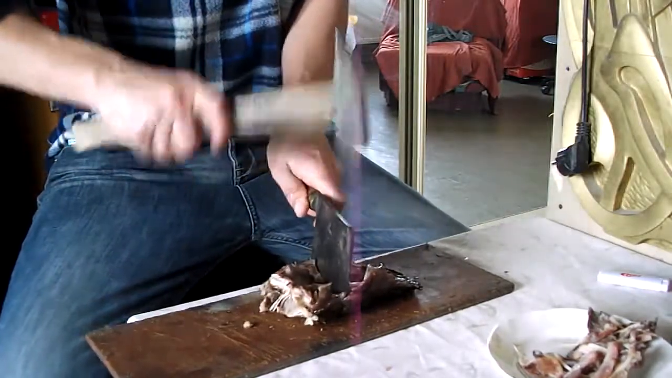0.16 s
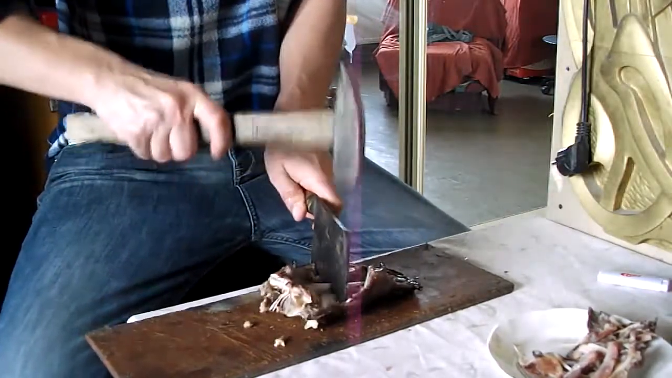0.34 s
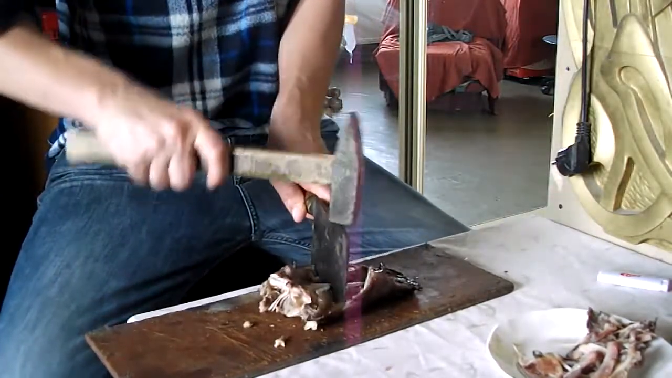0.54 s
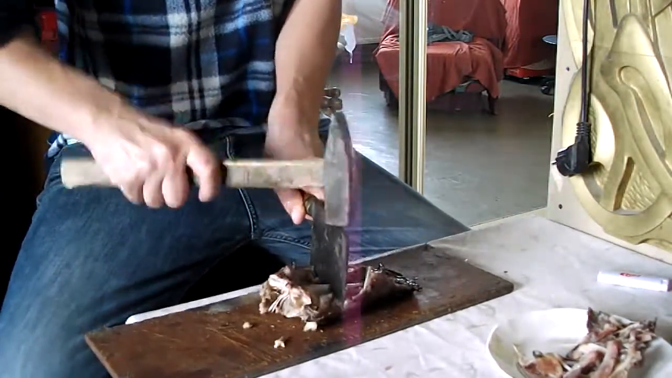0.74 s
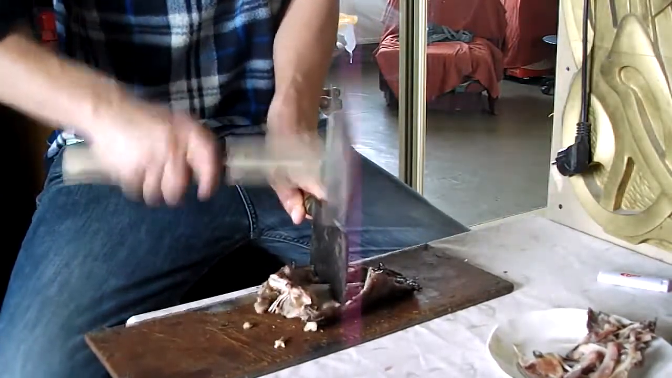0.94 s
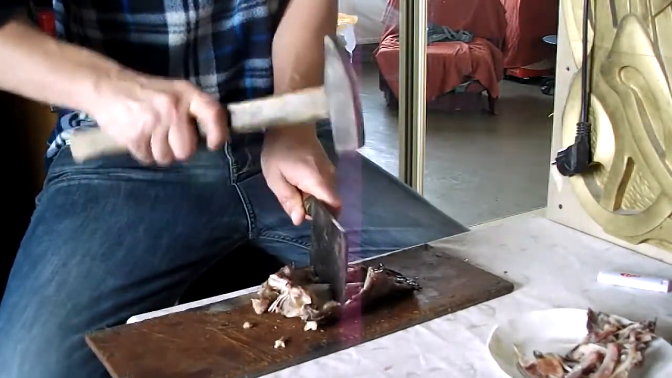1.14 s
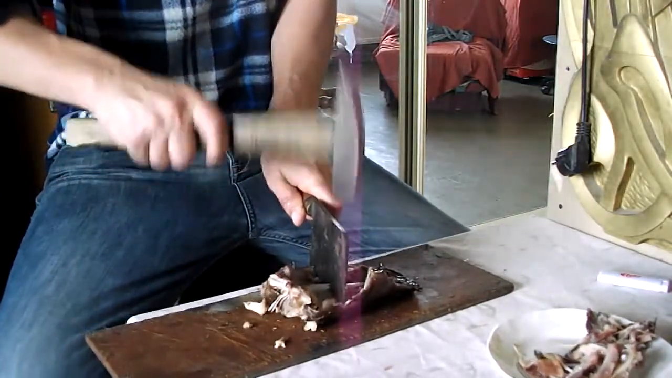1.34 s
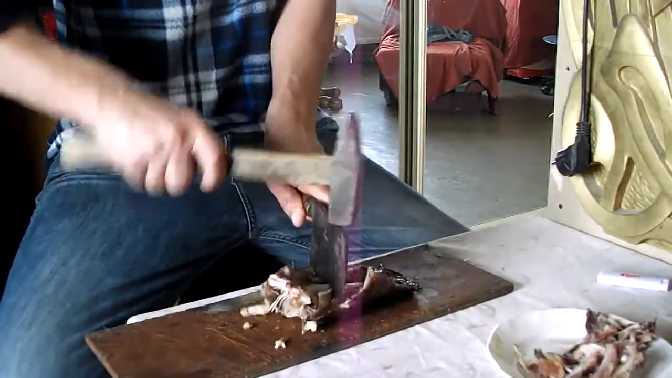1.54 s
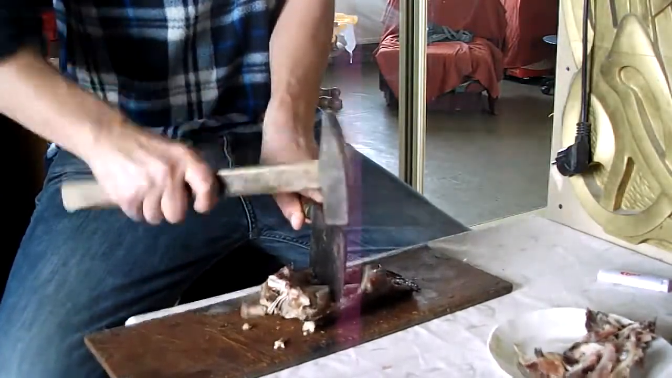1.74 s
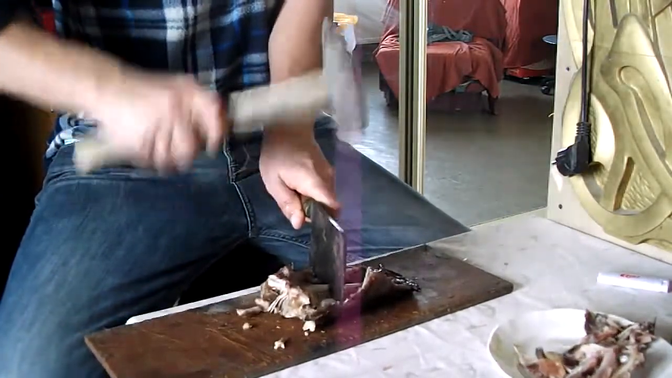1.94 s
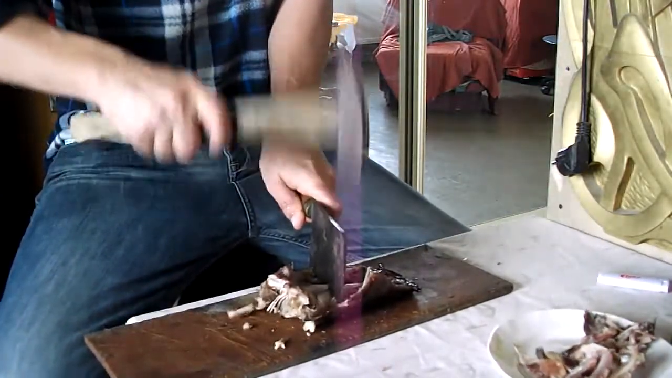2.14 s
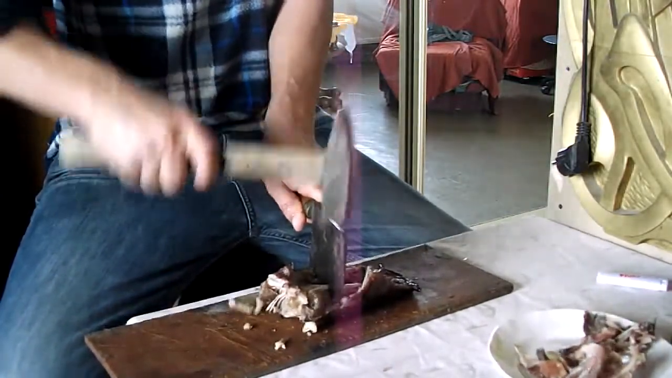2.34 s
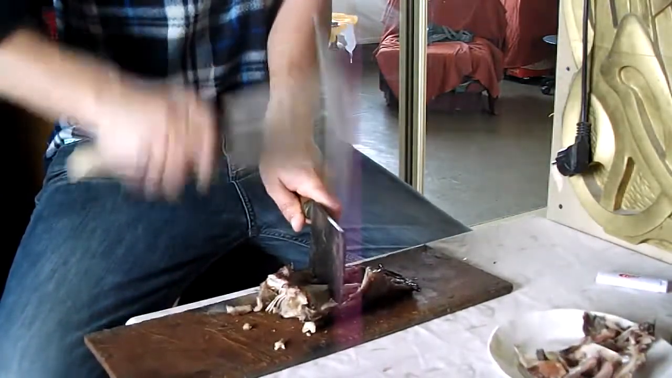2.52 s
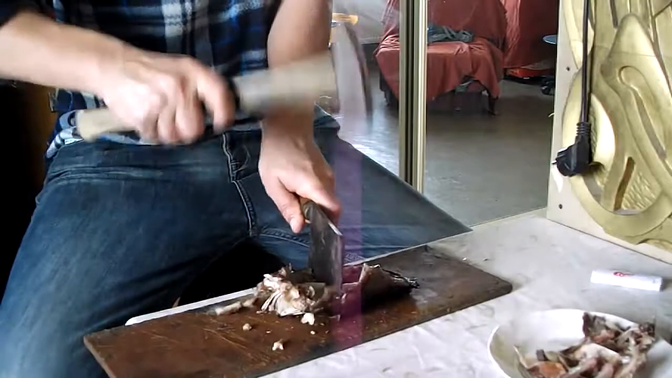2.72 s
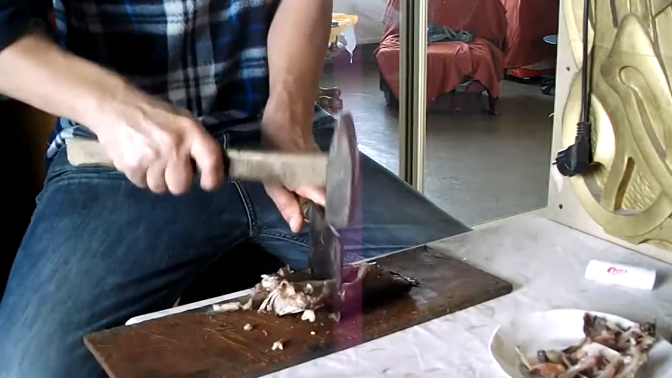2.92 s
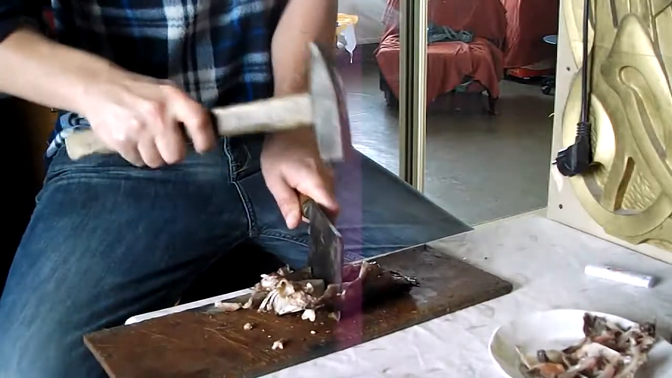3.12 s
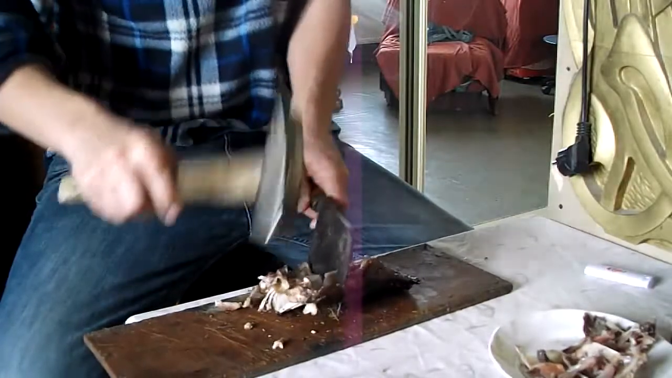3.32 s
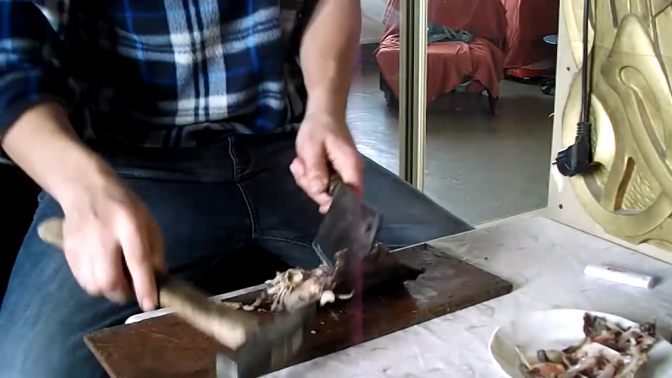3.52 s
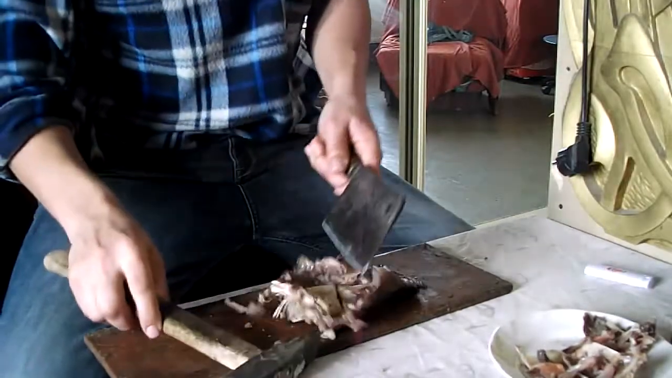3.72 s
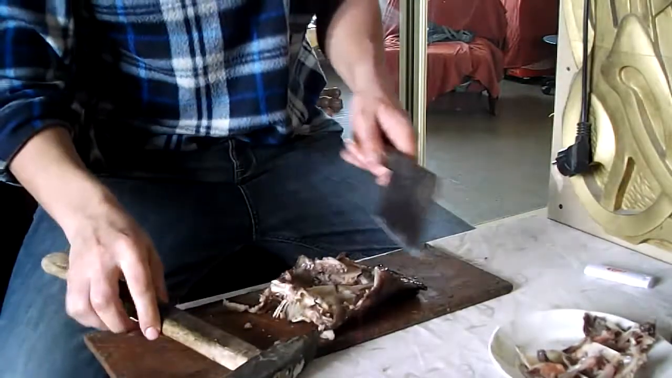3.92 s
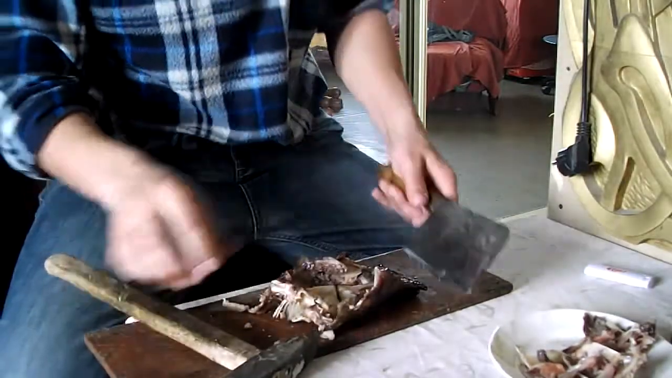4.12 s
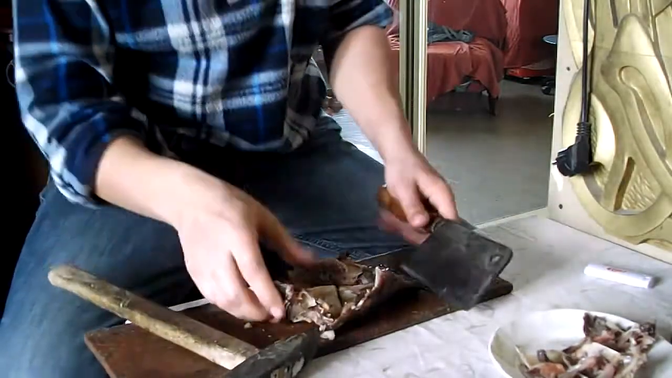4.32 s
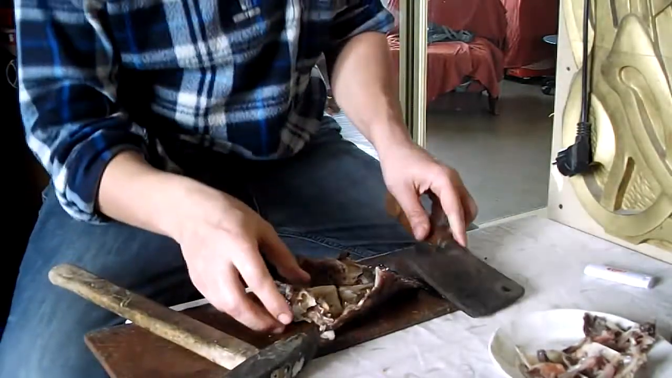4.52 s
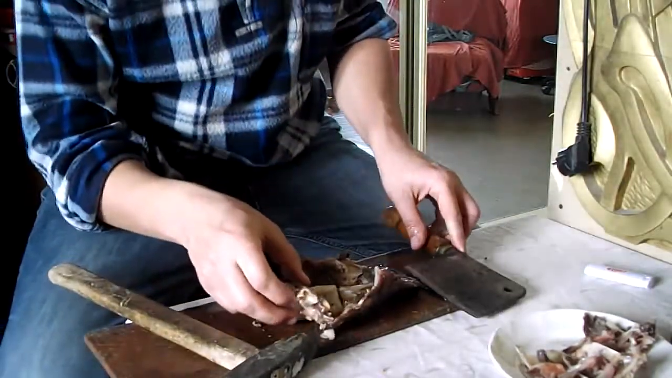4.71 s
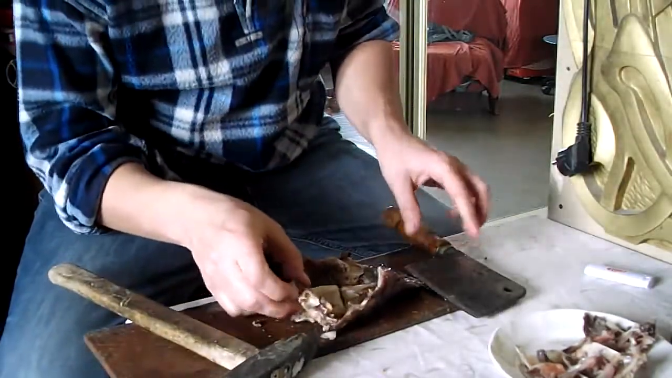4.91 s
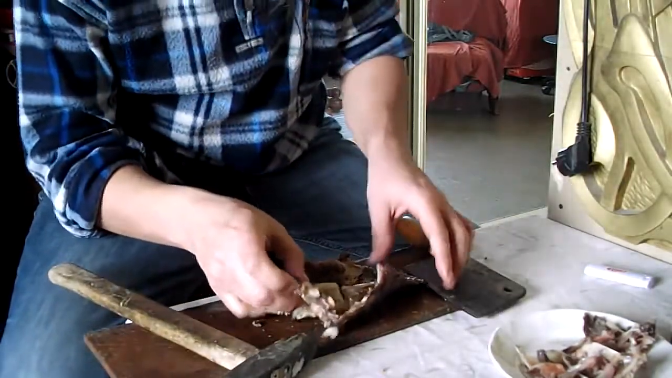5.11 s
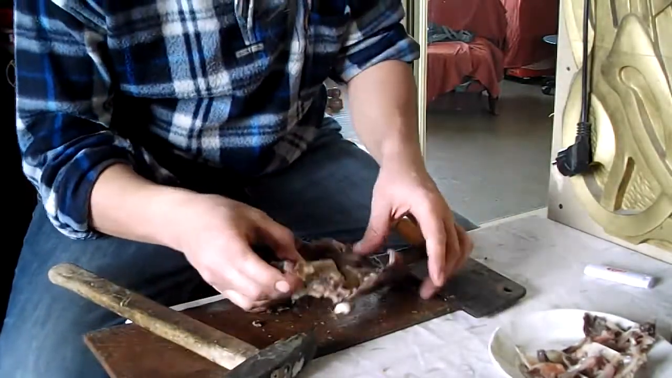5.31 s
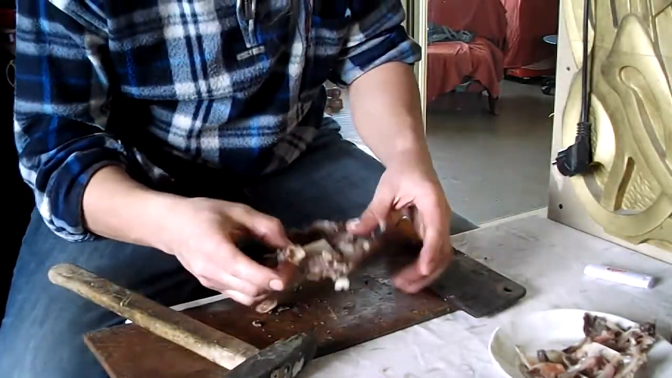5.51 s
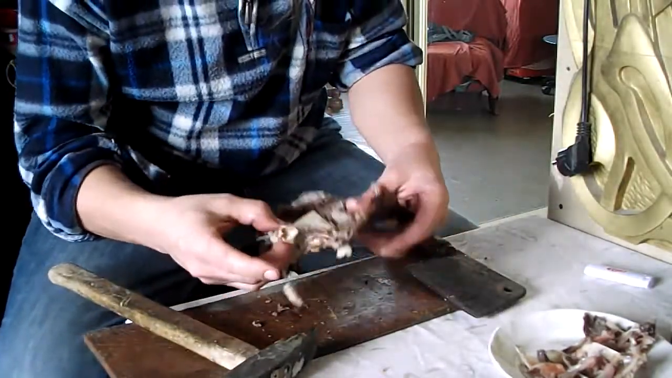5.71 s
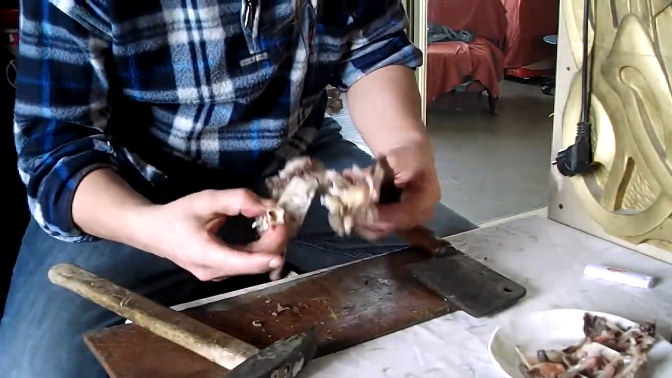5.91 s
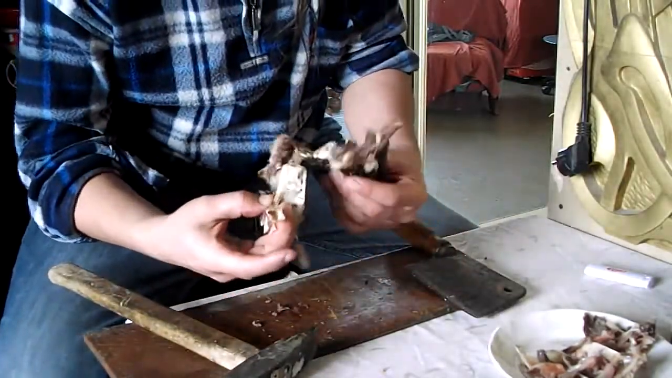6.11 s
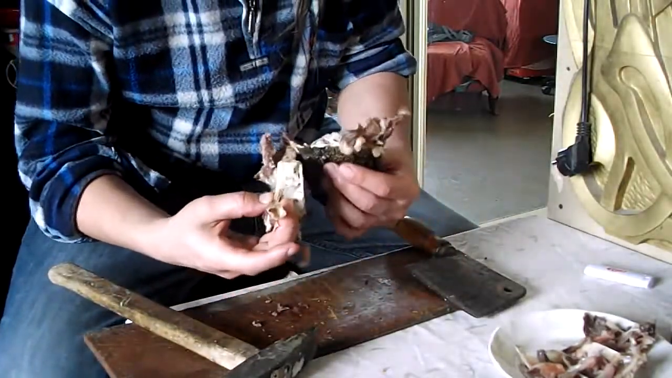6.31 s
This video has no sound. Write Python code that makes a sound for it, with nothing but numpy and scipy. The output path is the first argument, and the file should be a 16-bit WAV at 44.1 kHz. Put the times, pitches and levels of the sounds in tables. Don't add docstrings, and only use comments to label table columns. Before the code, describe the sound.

Rapid, regular hammer blows on a cleaver, bright and clipped at a nearby camera microphone, with brief hard-room reflections. The background hiss ducks after the blows and swells back once they stop. Next come a gritty blade drag, light clicks, a dull wooden touch and a sharp steel clank on the board, then sparse dry bone cracks and a short stick-slip creak over soft rumble and thin electronic whine.

```python
import sys
import numpy as np
from scipy import signal
from scipy.fft import rfft, irfft, next_fast_len
from scipy.io import wavfile
from scipy.ndimage import uniform_filter1d, map_coordinates

SR = 44100
rng = np.random.default_rng(int(sys.argv[2]) if len(sys.argv) > 2 else 0)


def transcribe(signal):
    frames = np.atleast_2d(signal).T
    limited = np.clip(frames, -1, 1)
    pcm = np.round(limited * 32767).astype(np.int16)
    wavfile.write(sys.argv[1], SR, pcm)


def to_linear_factor(level_db):
    exponent = np.asarray(level_db, float) / 20
    return 10 ** exponent


N = 284483

# t/s, clank level/dB, then relative to it table boom/dB, steel edge/dB, shove/dB
BLOW_EVENTS = [(0.171, -4, -29.5, -6, -25), (0.4193, -2, -23, -13, -16), (0.6707, -2, -17.5, -10.5, -8),
               (0.9109, -4.5, -16.5, -17, -10), (1.1658, -3.5, -15.5, -14, -31.5),
               (1.4203, -6, -18, -16, -24), (1.6807, -3, -19.5, -13, -27), (1.9558, -4, -18.5, -17, -14.5),
               (2.227, -4, -20, -20, -8), (2.503, -3.5, -25, -17, -11), (2.7769, 0.5, -22.5, -31, 3)]
EARLIER_BLOW = (-.09, -7, -24, -6, -30)
ALL_BLOWS = [EARLIER_BLOW, *BLOW_EVENTS]
# t/s, clank level/dB, then relative to it blade flex/dB, table boom/dB, board knock/dB
LAID_TOOLS = [
    (3.5701, -27, -7.5, 2.5, -15),
    (3.5948, -21, -10, -28, -18),
    (4.1924, -33, 4, 7, 8),
    (4.468, -2, -3, -16.5, -11),
    (4.644, -41, -12, 5, 3.5),
]


def unit(x):
    return x / np.sqrt(np.mean(x ** 2) + 1e-20)


def along(points, hz):
    f, v = np.transpose(points)
    return np.interp(np.log(hz + 1), np.log(f + 1), v)


def curve(rows):
    return np.interp(np.arange(N) / SR, *np.transpose(rows))


def wobble(rate):
    knots = rng.standard_normal(int(N * rate / SR) + 4)
    return map_coordinates(knots, [np.arange(N) * rate / SR])


def filtered(x, response):
    m = next_fast_len(len(x) + SR // 5)
    return irfft(rfft(x, m) * response(np.fft.rfftfreq(m, 1 / SR)), m)[:len(x)]


def noise(spectrum):
    return filtered(rng.standard_normal(N), lambda hz: to_linear_factor(along(spectrum, hz)))


def body(x, peaks, scatter_db):
    gains = to_linear_factor(scatter_db * rng.standard_normal(len(peaks)))
    y = 0
    for k, (centre, width, db) in enumerate(peaks):
        def mode(f):
            return gains[k] * to_linear_factor(db) * 1j * f * width / (centre ** 2 - f ** 2 + 1j * f * width)
        y = y + filtered(x[k % len(x)], mode)
    return y / np.abs(y).max()


def add(track, s, x):
    i = round(s * SR)
    part = x[max(-i, 0):N - i]
    track[max(i, 0):][:len(part)] += part


def since(times):
    age = np.arange(N) / SR - np.array(times)[:, None]
    return np.where(age < 0, np.inf, age)


def since_blow():
    return since([row[0] for row in ALL_BLOWS]).min(axis=0)


def gain_db():
    duck_db, recover_db_per_s, loud_db = 14, 49.5, -11
    loud = [s for s, db, *_ in [*ALL_BLOWS, *LAID_TOOLS] if db > loud_db]
    depth = [duck_db + 11]
    for gap in np.diff(loud):
        depth.append(duck_db + max(depth[-1] - recover_db_per_s * gap, 0))
    reduction = np.array(depth)[:, None] - recover_db_per_s * since(loud)
    return -np.maximum(reduction.max(axis=0), 0)


def hiss():
    # f/Hz, level/dB per Hz
    hiss_density = [(120, -30.5), (200, -5), (450, -12.5), (900, -16.5), (1500, -22), (3000, -18.5),
                    (5000, -19.5), (6800, -25), (8000, -19), (8900, -12.5), (9800, -23), (11300, -23.5),
                    (12500, -28), (15800, -40)]
    return to_linear_factor(gain_db() - 52.5 + 0.28 * wobble(10)) * unit(noise(hiss_density))


def whine():
    # f/Hz, rms level/dB
    whine_tones = [(10551, -72.5), (10632, -87.5), (10713, -61.5), (10794, -70.5), (10880, -69.5),
                   (10960, -78), (11364, -70.5)]
    t = np.arange(N) / SR
    tones = sum(to_linear_factor(db) * np.sin(2 * np.pi * (hz * t + rng.random())) for hz, db in whine_tones)
    return np.sqrt(2) * to_linear_factor(gain_db()) * tones


def shake():
    # t/s, rumble level/dB
    hand_leans = [
        (3.66, -41.5),
        (3.95, -48),
        (4.37, -48),
        (4.99, -55),
        (5.229, -45),
        (5.459, -54.5),
    ]
    half_width_s, t60 = 0.094, 1.6
    t = np.arange(N) / SR
    blows = to_linear_factor(-46.5 - 60 * since_blow() / t60)
    leans = sum(to_linear_factor(db) * np.exp(-((t - s) / half_width_s) ** 2) for s, db in hand_leans)
    return blows + leans + to_linear_factor(-55.5 + gain_db())


def rumble():
    # f/Hz, level/dB per Hz
    rumble_density = [(25, -12.5), (45, -2), (65, -4.5), (120, -7), (250, -19), (500, -30.5), (1000, -48.5),
                      (2000, -100)]
    lumps = to_linear_factor(1.3 * wobble(3) + 1.6 * wobble(37))
    return shake() * unit(lumps * noise(rumble_density))


def sway():
    # f/Hz, level/dB per Hz
    rock_density = [(8, -9.5), (18, 1), (28, -3.5), (45, -16.5), (70, -33), (120, -74)]
    u = np.minimum(since_blow() / 0.17, 20)
    swing = to_linear_factor(-40.5) * u ** 2 * np.exp(1 - u ** 2)
    still = to_linear_factor(-49 + gain_db() + 3 * wobble(7.3))
    return (swing + still) * unit(noise(rock_density))


def hum():
    # f/Hz, rms level/dB, on t/s, off t/s
    hum_tone = (901.5, -72, 3.15, 4.05)
    hz, db, on, off = hum_tone
    level = to_linear_factor(curve([(on - .1, -110), (on, db), (off, db), (off + 0.12, -110)]))
    return np.sqrt(2) * level * np.sin(2 * np.pi * hz * np.arange(N) / SR)


def kitchen(x, blur_hz):
    # f/Hz, t60/s
    kitchen_t60 = [(100, 0.22), (400, 0.24), (1200, 0.25), (3000, 0.32), (6000, 0.31), (7500, 0.28),
                   (11300, 0.31), (12000, 0.043)]
    hz, t, z = signal.stft(rng.standard_normal(len(x)), SR, nperseg=256)
    t60 = along(kitchen_t60, hz)[:, None]
    slow_tail = to_linear_factor(-19 - 60 * t / (2.64 * t60))
    decay = to_linear_factor(-60 * t / t60) + slow_tail
    tail = signal.istft(z * decay, SR, nperseg=256)[1]
    tail = tail / np.linalg.norm(tail)
    tail = np.pad(tail, (round(.004 * SR), 0))[:len(x)]
    bins = max(round(blur_hz * len(x) / SR), 1)
    power = uniform_filter1d(np.abs(rfft(x)) ** 2, bins)
    spectrum = np.sqrt(np.abs(power))
    return filtered(tail, lambda f: np.interp(f, np.fft.rfftfreq(len(x), 1 / SR), spectrum))


def creak():
    # start t/s, end t/s, slip rate f/Hz, first slip level/dB
    joint_twist = (6.212, 6.4, 96, -38.5)
    # f/Hz, width/Hz, level/dB
    joint_modes = [(1200, 90, 0), (2700, 300, -22)]
    on, off, rate, db = joint_twist
    draw = rng.standard_normal((30, 2))
    times = on + np.cumsum(np.exp(0.18 * draw[:, 0]) / rate)
    slips = np.zeros(N)
    places = np.minimum(times * SR, N - 1).astype(int)
    slips[places] = to_linear_factor(-10 + 3 * draw[:, 1]) * (times < off)
    slips[round(on * SR)] = 1
    return to_linear_factor(db) * body(np.array([slips, -slips]), joint_modes, 0)


def drag():
    # start t/s, peak t/s, end t/s, level/dB
    drag_strokes = [
        (3.36, 3.384, 3.435, -49),
        (3.414, 3.642, 3.866, -42),
        (4.192, 4.367, 4.9, -48),
    ]
    # f/Hz, level/dB per Hz
    scrape_density = [(1000, -22), (2000, -3.5), (2400, -10), (3300, -9.5), (3720, -4), (3850, 5),
                      (3980, -4), (4700, -3), (5000, -4.5), (5900, -13), (7000, -26.5), (9000, -31)]
    slips = rng.standard_normal(N) * to_linear_factor(2.5 * wobble(220) + 1.2 * wobble(26))
    rub = unit(filtered(slips, lambda hz: to_linear_factor(along(scrape_density, hz))))
    strength = np.zeros(N)
    for on, top, off, db in drag_strokes:
        ends_db = db - 14
        strength += to_linear_factor(curve([(on - .02, -90), (on, ends_db), (top, db), (off, ends_db), (off + 0.055, -90)]))
    return strength * rub


def bones():
    # t/s, peak level/dB, pitch f/Hz, broad snap relative level/dB
    bone_clicks = [(3.1396, -53, 4550, 1), (3.1794, -58, 5070, 6), (3.2297, -61, 2620, -10),
                   (3.2716, -43, 3270, -3), (3.2907, -45, 3300, 0), (3.512, -36, 5840, -7),
                   (3.616, -38.5, 3740, 9), (3.727, -46, 1040, -20), (3.907, -37.5, 5530, -4.5),
                   (4.2503, -31.5, 5500, -1), (4.3856, -42.5, 2500, -4.5), (4.403, -38, 2500, -14),
                   (4.425, -46, 2500, -9), (4.4364, -38, 2620, -10), (4.9283, -44, 1072, -20),
                   (5.2586, -29.5, 5410, -2), (5.4346, -43.5, 4100, -5.5), (5.6878, -33, 3320, -7),
                   (5.7021, -29, 3420, -1), (5.705, -42, 3160, -4), (5.8177, -46, 4500, -5),
                   (5.839, -51, 2320, 14), (5.898, -53, 4130, -17), (5.95, -43, 4130, 11),
                   (6.0133, -44.5, 4450, 19.5), (6.0462, -46.5, 5100, 7), (6.0983, -42, 4700, -5),
                   (6.388, -43, 4850, 10.5)]
    snap_modes = [(2680, 590, 13.0), (4500, 800, 16.0), (7000, 830, -29)]  # f/Hz, width/Hz, level/dB
    ring_cycles = 23
    out = np.zeros(N)
    t = np.arange(SR // 4) / SR
    for s, db, hz, snap_db in bone_clicks:
        jolt = to_linear_factor(-60 * t / 0.014) * rng.standard_normal((2, len(t)))
        mode = [(hz, 3 * hz / ring_cycles, 0)]
        ring = body(body(jolt, mode, 0)[None], mode, 0)
        tick = ring + to_linear_factor(snap_db) * body(jolt, snap_modes, 1.4)
        add(out, s, to_linear_factor(db) * (tick + to_linear_factor(-7.5) * kitchen(tick, blur_hz=200)))
    return out


def steel(force, clank, flex, flex_db, edge_db):
    # f/Hz, width/Hz, level/dB
    edge_modes = [(7560, 1100, 12.5), (7880, 1300, 6.5), (10000, 510, -35), (10000, 1300, 4),
                  (10500, 990, -16.5)]
    bending = to_linear_factor(flex_db) * body(force, flex, 0.18)
    crack = to_linear_factor(edge_db) * body(force, edge_modes, 0.87)
    return body(force, clank, 0.94) + bending + crack


def hammer_ring(t):
    # f/Hz, level/dB, t60/s
    head_modes = [(8160, 0, .45), (11210, -5, .25), (11600, -10, .15)]
    ring = np.zeros(len(t))
    for hz, db, t60 in head_modes:
        beat = 0.5 + 0.8 * map_coordinates(rng.standard_normal(200), [t * 130])
        ring += to_linear_factor(db - 60 * t / t60) * beat * np.sin(2 * np.pi * hz * t)
    return ring


def impact(row, clank, flex, table, soft_hz, wood_db, chatter_t60, ring_db, drive_db, wet_db):
    # f/Hz, width/Hz, level/dB
    board_modes = [(390, 78.4, 1.5), (644, 170, -0.5), (853, 45, 6), (942, 190, 2.5), (1202, 480, 1)]
    clank_db, flex_db, boom_db, knock_db, edge_db = row
    t = np.arange(SR // 5) / SR
    both_signs = np.array([[1.], [-1.]])
    chatter = to_linear_factor(-60 * t / chatter_t60) * rng.standard_normal((3, len(t)))
    push = (np.exp(-t / 0.001) + 0.073 * chatter[0]) * both_signs

    def soft(x):
        return filtered(x, lambda f: 1 / (1 + 1j * f / soft_hz) ** 2)

    blade = soft(steel(chatter, clank, flex, flex_db, edge_db))
    colour = soft(soft(steel((t == 0) * both_signs, clank, flex, flex_db, 0.47 * edge_db - 1.5)))
    colour *= np.linalg.norm(blade) / np.linalg.norm(colour)
    wood = to_linear_factor(boom_db) * body(push, table, 0.81) + to_linear_factor(knock_db) * body(push, board_modes, 2.3)
    blade, colour, wood = np.pad([blade, colour, wood], ((0, 0), (0, SR // 2)))
    room = kitchen(colour, blur_hz=610) + to_linear_factor(wood_db) * kitchen(wood, blur_hz=87)
    ring = to_linear_factor(0.5 * edge_db + ring_db) * hammer_ring(np.arange(len(room)) / SR)
    return to_linear_factor(clank_db) * (to_linear_factor(drive_db) * (blade + wood) + to_linear_factor(wet_db) * room + ring)


def laid_tools():
    # f/Hz, width/Hz, level/dB
    flat_modes = [(1240, 1500, -3), (1740, 480, -1.5), (2150, 74, 3.5)]
    # f/Hz, width/Hz, level/dB
    slap_modes = [(2400, 230, 0.5), (2900, 33, 6), (3550, 2400, 1.5), (4600, 300, 4.5), (5550, 740, -12.5)]
    # f/Hz, width/Hz, level/dB
    rest_modes = [(162, 24, 5), (62, 10.7, -21), (234, 80, -3)]
    out = np.zeros(N)
    for s, *levels in LAID_TOOLS:
        contact = impact([*levels, -36.5], slap_modes, flat_modes, rest_modes, soft_hz=4500, wood_db=8.5,
                         chatter_t60=0.038, ring_db=-55.5, drive_db=6, wet_db=-3.5)
        add(out, s - .001, contact)
    return out


def hammer_blows():
    # f/Hz, width/Hz, level/dB
    clank_modes = [(2560, 610, 0), (3060, 420, 3.5), (3605, 980, 3.5), (4226, 1200, 4), (5430, 130, 3),
                   (6070, 280, -5), (6450, 530, -12)]
    # f/Hz, width/Hz, level/dB
    flex_modes = [(1250, 83, -10.5), (1621, 130, 9), (1872, 100, 14), (2210, 300, 3.5), (2390, 77, 6.5)]
    # f/Hz, width/Hz, level/dB
    boom_modes = [(162, 22, 6.5), (62, 3.3, -11), (223, 150, -3)]
    blade_share = 0.52
    shove = np.hanning(round(0.0085 * SR))
    out = np.zeros(N)
    for s, clank_db, boom_db, edge_db, shove_db in ALL_BLOWS:
        flex_db = -15 + 3.5 * s
        knock_db = -1.64 + blade_share * flex_db + (1 - blade_share) * boom_db
        row = clank_db, flex_db, boom_db, knock_db, edge_db
        blow = impact(row, clank_modes, flex_modes, boom_modes, soft_hz=18200, wood_db=6.5,
                      chatter_t60=0.02, ring_db=-24.5, drive_db=16.5, wet_db=1.5)
        add(out, s - .001, blow)
        add(out, s, to_linear_factor(clank_db + shove_db) * shove)
    return out


def scene():
    background = hiss() + whine() + rumble() + sway() + hum()
    hands = creak() + drag() + bones()
    return np.tile(background + hands + laid_tools() + hammer_blows(), (2, 1))


def starved(x):
    block, offset = 1024, 330
    keep = np.ones(N)
    for s, *_ in BLOW_EVENTS:
        end = round((s - .004) * SR)
        start = (end - offset) // block * block + offset
        keep[start:end] = to_linear_factor(-23.5)
    treble = filtered(x, lambda hz: 1 / (1 + (600 / (hz + 1)) ** 4))
    return x - treble * (1 - uniform_filter1d(keep, size=88))


def top_cut(x):
    return signal.sosfilt(signal.butter(12, 15990, fs=SR, output="sos"), x)


def record(dry):
    # f/Hz, level/dB
    mic_response = [(20, -1.5), (11000, 5), (12500, -0.5), (15500, -13.5), (16200, -44)]
    x = filtered(dry[0], lambda hz: to_linear_factor(along(mic_response, hz)))
    x = x / (1 + np.abs(x / 0.96) ** 12) ** (1 / 12)
    x = filtered(starved(x), lambda hz: hz < 16000)
    return top_cut(np.array([np.roll(x, shift=1), x]))


dry = scene()
out = record(dry)
transcribe(out)
```